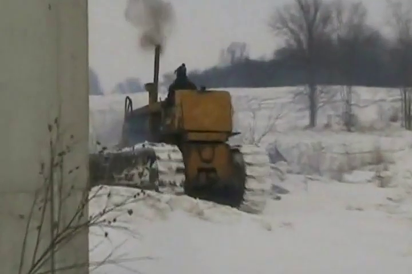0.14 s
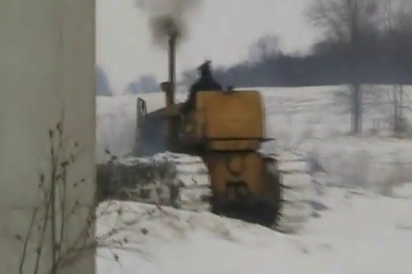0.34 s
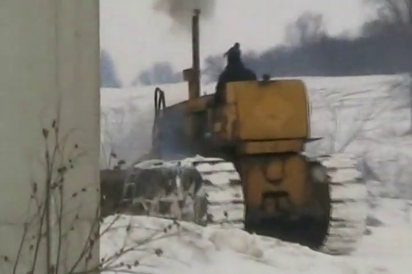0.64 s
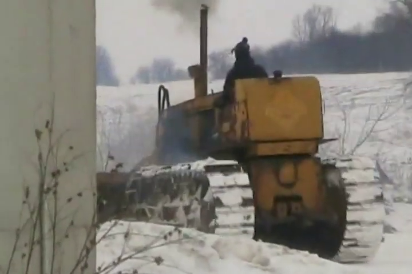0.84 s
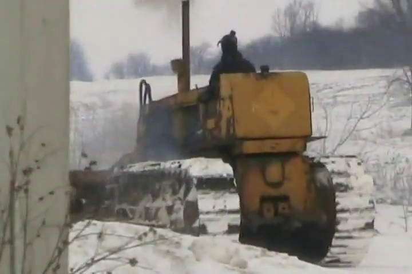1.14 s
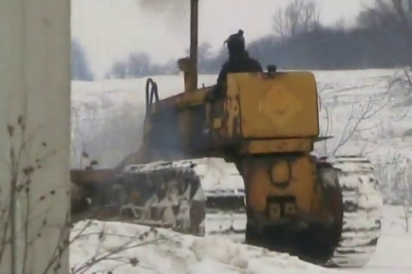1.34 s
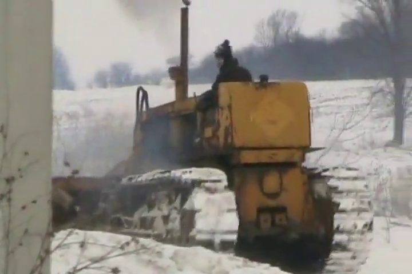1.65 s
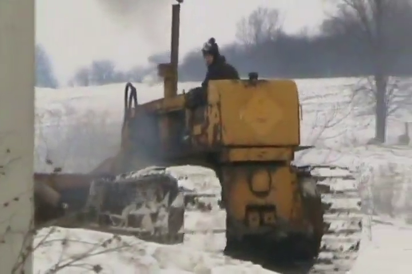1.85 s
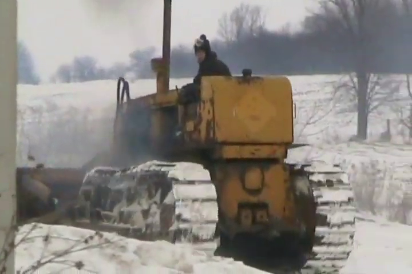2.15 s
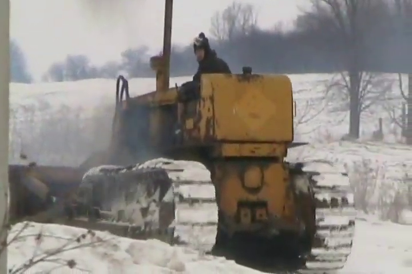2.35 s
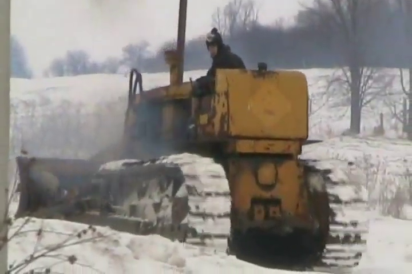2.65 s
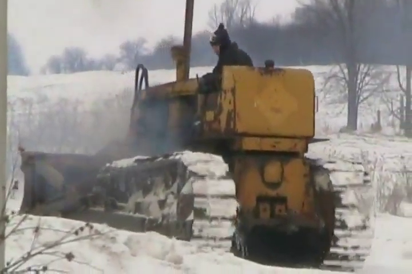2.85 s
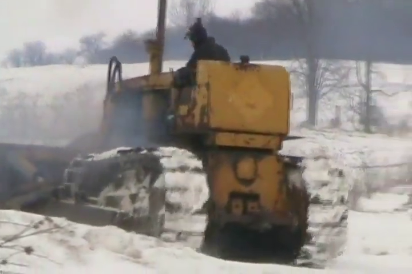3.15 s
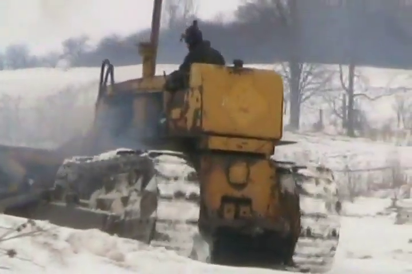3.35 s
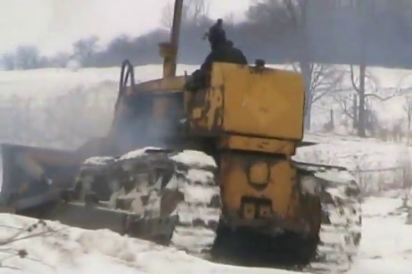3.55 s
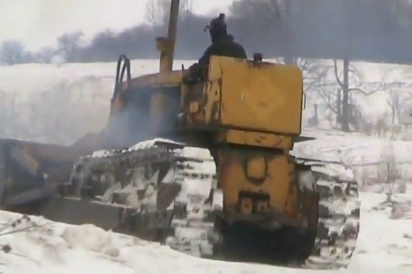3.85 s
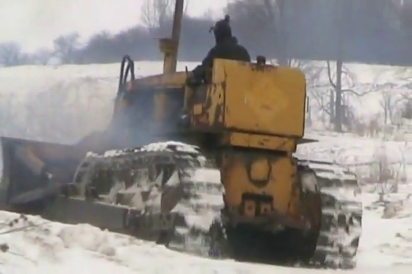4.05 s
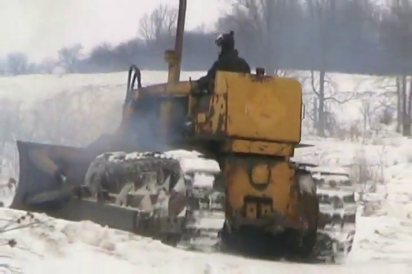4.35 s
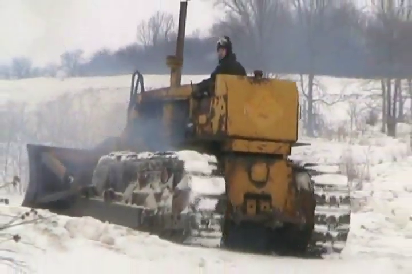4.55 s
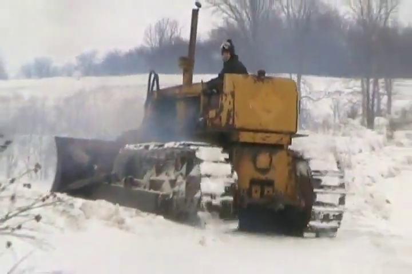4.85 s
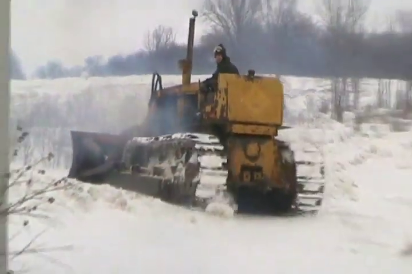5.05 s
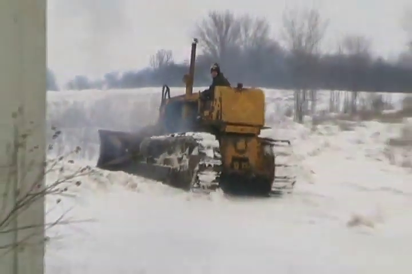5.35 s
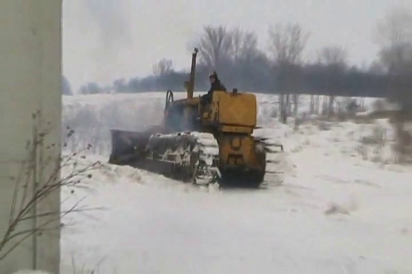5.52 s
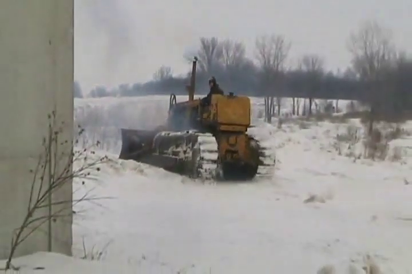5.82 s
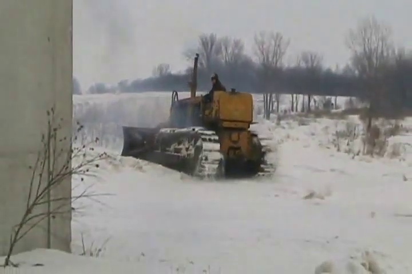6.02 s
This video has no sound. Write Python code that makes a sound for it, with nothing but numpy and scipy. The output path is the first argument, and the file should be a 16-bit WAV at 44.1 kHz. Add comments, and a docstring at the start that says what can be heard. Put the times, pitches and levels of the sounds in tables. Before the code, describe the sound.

An old crawler bulldozer with a diesel engine runs outdoors on snow. At 0 s it idles roughly, with hard, separate metallic knocks about eleven times a second, lighter taps between them and some uneven blows. The revs dip slightly near 0.5 s, then climb in small surges from about 0.6 to 3.3 s; the knocks crowd together into a louder, brighter, harsh clatter at around eighteen a second. A dry wash of gear rattle and small clinks from the tracks thickens with the speed, and a faint gear whine rises. A low exhaust throb and soft puffing lie underneath. From about 3.3 s to the end at 6.2 s the engine holds steady at high revs; after 4.5 s a thin steely ping within the knocks fades. The sound is dry, midrange-heavy and almost mono, with very short reflections, and it stops while still running.

```python
"""Diesel bulldozer revving up

An old six-cylinder diesel bulldozer revs up from idle and crawls through snow past a concrete wall.
Two cylinders knock hard in every cycle, as noise bursts that ring block and panels; lighter taps fall between.
Below lies the exhaust throb, a sum of crankshaft orders, with a rush of noise pulsing at the firing rate.
Filtered noise and ticks make the gear rattle, short decaying notes the tracks, two climbing sines the gear whine."""
import sys
import numpy as np
from scipy import signal
from scipy.fft import rfft, irfft
from scipy.io import wavfile
from scipy.ndimage import uniform_filter1d

SR = 44100
rng = np.random.default_rng(int(sys.argv[2]) if len(sys.argv) > 2 else 0)


def int16_out(signal):
    """Quantize to a 16-bit WAV file."""
    q = np.round(np.clip(np.atleast_2d(signal).T, -1, 1) * 32767)
    wavfile.write(sys.argv[1], SR, q.astype(np.int16))


N = 272538
TIME = np.arange(N) / SR

# engine speed, hunting at idle and then opened up to full revs: t/s, firing rate/Hz
SPEED = [(0, 32.88), (0.45, 31.56), (0.7, 35.39), (1, 34.06), (1.25, 38.99), (1.5, 38.54), (1.9, 43.5),
         (2.25, 45.43), (2.55, 50.69), (3.35, 54.01), (5, 54.73), (6.18, 54.13)]
CYLINDERS = 6
FULL_REVS_HZ = 54  # reference firing rate
START_CYCLES = -.169  # place in the engine cycle at t = 0
# the engine burns more fuel while it gathers speed; the levels answer a moment later
FUEL_LAG_S, FUEL_SMOOTH_S = 0.014, 0.61
# how each part follows the engine: value at full revs/dB, slope/(dB per octave of speed),
# lift while speeding up/(dB per octave per second)
KNOCK_LEVEL = (-18.5, 4.9, 3.75)
KNOCK_TREBLE = (1.6, 4.4, 0.55)
RATTLE_LEVEL = (-22.5, 6.8, 1.8)
RUSH_LEVEL = (-35, 3.7, -0.85)
WHINE_LEVEL = (-46.5, -1.5, 6.1)

# blows of one engine cycle: place in the cycle (0-1), relative level/dB, rise/s, length at full revs/s,
# decay time/s, relative treble/dB, relative panel ring/dB
BLOWS = [(0.089, -25, 0.0029, 0.018, 0.012, 13.5, -5), (0.287, -2, 0.00068, 0.0066, 0.0068, -2, -1),
         (0.616, -12.5, 0.0019, 0.0081, 0.0024, -2.5, -15), (0.787, -15, 0.0028, 0.011, 0.0058, 0, -2),
         (0.949, 0.2, 0.002, 0.0085, 0.0039, -2.5, -13)]
BLOW_STRETCH = 0.48  # a blow's length goes with the cycle time to this power
# knocks that stand out, from a weak or a hard firing: t/s, extra level/dB
ODD_KNOCKS = [(.27, -2.5), (.46, 3.5), (.93, -6.5), (1.1, -7), (1.31, 1), (1.41, -4.5), (1.86, -3),
              (2.31, 1.5), (4.21, 0.5), (5.34, 0), (5.56, 3.5)]
SAME_KNOCK_S = .012  # a blow this close to a listed time takes its extra level
# a thin steel part pings, against the panel ring; it fades as the machine turns its back
PING_DB, PING_TURNED_DB, TURN_START_S, TURN_LENGTH_S = -1.5, -27, 4.5, 0.78
# resonances of block and panels: f/Hz, width/Hz, lift/dB
PANELS = [(340, 6.8, 6), (383, 86, 2.5), (541, 28, 7), (719, 40, 7.5), (903, 65, 6.5), (985, 12, 6),
          (1180, 46, 0), (1600, 41, 0), (1740, 210, 2), (1940, 45, 2.5), (2126, 125, 4), (2424, 31, 2.5),
          (2450, 190, 1), (3690, 330, 2), (4096, 35, -2.5), (4170, 100, -0.5)]
# broad spectra of knocks, rattle and exhaust rush: f/Hz, relative level/dB
KNOCK_COLOUR = [(150, -29), (350, -17.5), (580, -20.5), (850, -6.5), (1250, 1), (1600, -4.5), (2200, -5),
                (3200, -11.5), (4000, -6.5), (5900, -15.5), (8500, -13), (10600, -22), (11500, -30),
                (12500, -84)]
RATTLE_COLOUR = [(150, -18), (400, -20), (600, -4), (900, 3), (1200, 3), (1550, -1), (2000, 0), (3100, -8),
                 (4200, -10.5), (6200, -14), (8500, -17.5), (10600, -23.5), (11600, -52), (12600, -32)]
RUSH_COLOUR = [(12, -10), (28, -2), (60, 4.5), (100, 0.5), (160, 1), (205, -5), (260, -7.5), (380, -2.5),
               (520, -7.5), (900, -22.5), (3000, -60)]

# exhaust orders: multiple of the cycle rate, relative level/dB
ORDERS = [(3, -22), (5, -15), (6, 4.5), (7, -21), (8, -19), (9, -9), (11, -26), (12, -2.5), (15, -31),
          (18, -14), (24, -7.5), (36, -17.5)]
# what the stack passes of each exhaust order: f/Hz, gain/dB
STACK = [(15, -16), (32, -6.5), (55, -3.5), (80, -2), (110, -2), (150, -2.5), (200, -12.5), (260, -2.5),
         (330, 2.5)]
# exhaust throb: t/s, level/dB, lift of its firing overtones/dB
THROB = [(0, -35, 4.5), (1, -34.5, -0.5), (2.8, -32, 1.5), (4.3, -36, -6), (5.2, -35, 4),
         (6.18, -36.5, 1.5)]

# upper gear tone, climbing with the revs: t/s, f/Hz
WHINE_PITCH = [(0, 700), (1, 760), (1.25, 845), (1.85, 915), (2.17, 1027), (2.4, 1038), (2.7, 1130),
               (6.18, 1185)]
# resonances of the gear case: f/Hz, width/Hz, lift/dB
GEAR_CASE = [(941, 154, 16), (1030, 30, 14)]

# difference signal between the channels, relative to the sound itself: f/Hz, level/dB
WIDTH = [(40, -26), (200, -24), (600, -26), (1400, -53), (2800, -40.5), (4500, -18.5), (6000, -16.5),
         (8000, -4.5), (10000, -4), (12000, -28)]
EDGE_HZ = 12850  # upper band limit


def from_db(db):
    """Logarithmic level: 20 dB is a factor of ten in amplitude."""
    return 10 ** (np.asarray(db) / 20)


def unit(x):
    """Normalization: scales to rms 1."""
    return x / np.sqrt(np.mean(x ** 2) + 1e-20)


def curve(rows, axis=1):
    """Linear interpolation: one column of a time table at every sample."""
    columns = np.transpose(rows)
    return np.interp(TIME, columns[0], columns[axis])


def spectrum_db(points, hz):
    """Logarithmic frequency scale: reads a spectrum between its points."""
    f, db = np.transpose(points)
    return np.interp(np.log(hz + 1), np.log(f + 1), db)


def resonance_db(hz, modes):
    """Resonance: each mode lifts the level in a bell around its own frequency."""
    return sum(lift / (1 + (2 * (hz - f) / width) ** 2) for f, width, lift in modes)


def wander(rate_hz):
    """Low-passed noise: a smooth random signal of rms 1, weak above the given rate."""
    hz = np.fft.rfftfreq(N, 1 / SR)
    noise = rng.standard_normal(N)
    return unit(irfft(rfft(noise) / (1 + (hz / rate_hz) ** 4), N))


def colour(x, points, modes=(), size=8192):
    """Minimum-phase filtering: a broad spectrum with narrow resonances that ring on."""
    hz = abs(np.fft.fftfreq(size, 1 / SR))
    db = spectrum_db(points, hz) + resonance_db(hz, modes)
    # the Hilbert transform of the log magnitude gives the causal phase
    transfer = np.exp(np.conj(signal.hilbert(np.log(from_db(db)))))
    response = np.fft.ifft(transfer).real
    return signal.oaconvolve(x, response[:size // 2])[:N]


def add(mix, s, sound):
    """Superposition: adds a sound to the mix at time s."""
    part = mix[max(round(s * SR), 0):][:len(sound)]
    part += sound[:len(part)]


def engine_db(full_db, per_octave_db, speeding_up_db):
    """Engine load: a level follows the revs and the fuel burnt to gather speed."""
    octaves = np.log2(curve(SPEED) / FULL_REVS_HZ)
    octaves_per_s = np.gradient(octaves) * SR
    climb = uniform_filter1d(octaves_per_s, max(round(FUEL_SMOOTH_S * SR), 1))
    late_climb = np.interp(TIME - FUEL_LAG_S, TIME, climb)
    return full_db + per_octave_db * octaves + speeding_up_db * late_climb


def ring(t, hz, swell_s):
    """Damped vibration: a part shaken by the chatter swells and dies within milliseconds."""
    return (t / swell_s) ** 2 * np.exp(-t / swell_s) * np.sin(2 * np.pi * hz * t)


def knocks(cycles, jitter_s=.0005, uneven_db=.5, length_spread=0.1, treble_uneven_db=2, treble_hz=3500,
           ring_hz=1290, ring_spread=0.099, ring_s=0.0023, ring_uneven_db=3,
           ping_hz=4000, ping_s=0.0029, ping_spread=0.025, ping_uneven_db=4,
           patchy_db=3, lumpy_db=-1.5, size=3000, count=36):
    """Impact excitation: bursts of metal-on-metal chatter set panels ringing for a few periods."""
    t = np.arange(size) / SR
    chatter, sizzle, rings = np.zeros((3, N))
    for place, db, rise_s, length, decay, treble_db, ring_db in BLOWS:
        marks = np.arange(-1, cycles[-1]) + place
        marks = marks[(marks > cycles[0]) & (marks < cycles[-1])]
        for s in np.interp(marks, cycles, TIME):
            early, force, bright, long, pitch, rung, sharp, pinged = np.clip(rng.standard_normal(8), -2, 2)
            start = s + jitter_s * early
            stretch = (FULL_REVS_HZ / np.interp(s, *np.transpose(SPEED))) ** BLOW_STRETCH
            held = length * stretch * np.exp(length_spread * long)
            shape = np.minimum(t / rise_s, 1) * np.exp(-np.maximum(t - held, 0) / decay)
            odd_db = sum(extra for at, extra in ODD_KNOCKS if abs(at - s) < SAME_KNOCK_S)
            # a longer burst is weaker, to keep its energy
            gain = from_db(db + odd_db + uneven_db * force) * np.sqrt(length / held)

            # the parts bounce, so the burst comes in lumps
            lumps = from_db(lumpy_db * signal.resample(rng.standard_normal(count), size))
            grain = unit(lumps * rng.standard_normal(size))
            add(chatter, start, gain * shape * grain)

            # the upper partials are weighted afresh each time
            patches = from_db(patchy_db * signal.resample(rng.standard_normal(count), size // 2 + 1))
            patchy_grain = unit(irfft(rfft(grain) * patches))
            treble_gain = from_db(treble_db + treble_uneven_db * bright)
            add(sizzle, start, gain * shape * patchy_grain * treble_gain)

            clank_hz = ring_hz * np.exp(ring_spread * pitch)
            clank = from_db(ring_db + ring_uneven_db * rung) * ring(t, clank_hz, ring_s)
            turned = np.clip((s - TURN_START_S) / TURN_LENGTH_S, 0, 1)
            ping_db = PING_DB + PING_TURNED_DB * turned + ring_db + ping_uneven_db * pinged
            ping = from_db(ping_db) * ring(t, ping_hz * np.exp(ping_spread * sharp), ping_s)
            add(rings, start, gain * (clank + ping))

    below = signal.butter(1, treble_hz, fs=SR)
    treble = (sizzle - signal.lfilter(*below, sizzle)) * from_db(engine_db(*KNOCK_TREBLE))
    drive = signal.lfilter(*below, chatter) + treble + from_db(-4) * rings
    return unit(colour(drive, KNOCK_COLOUR, PANELS)) * from_db(engine_db(*KNOCK_LEVEL))


def yard(x, t60_s=0.071, delay_s=.005, wet_db=-10, dull_hz=4500, size=10000, count=4):
    """Scattering: short echoes off blade, tracks and wall, whose paths change as the machine moves."""
    t = np.arange(size) / SR
    out = np.zeros(N)
    position = np.linspace(0, count - 1, N)
    for k in range(count):
        taps = rng.standard_normal(size) * (t > delay_s) * from_db(-60 * t / t60_s)
        taps = signal.lfilter(*signal.butter(1, dull_hz, fs=SR), taps / np.linalg.norm(taps))
        # equal-power crossfade from one set of paths to the next
        share = np.sqrt(np.maximum(1 - abs(position - k), 0))
        out += signal.oaconvolve(x * share, taps)[:N]
    return from_db(wet_db) * out


def rattle(ticks_per_s=700, flutter_db=3.5, treble_hz=2500, brightening=0.46):
    """Dense random impacts: gear and valve-train ticks in a fluttering wash, brighter when busier."""
    ticks = (rng.random(N) < ticks_per_s / SR) * rng.choice([-1, 1], N)
    wash = rng.standard_normal(N)
    drive = (wash + unit(ticks)) * from_db(flutter_db * wander(37.4))
    busy_db = engine_db(*RATTLE_LEVEL)
    dull = signal.lfilter(*signal.butter(1, treble_hz, fs=SR), drive)
    drive = dull + (drive - dull) * from_db(brightening * (busy_db - busy_db.mean()))
    return unit(colour(drive, RATTLE_COLOUR, PANELS)) * from_db(busy_db)


def tracks(clinks_per_s=60, low_hz=800, high_hz=2600, ring_s=0.013, level_db=-10, size=2500, count=24):
    """Free damped vibration: snow-packed links and pins clink at random, each with a note of its own."""
    t = np.arange(size) / SR
    out = np.zeros(N)
    for hz in np.geomspace(low_hz, high_hz, count):
        strikes = (rng.random(N) < clinks_per_s / count / SR) * rng.uniform(0.5, 1, N)
        envelope = np.exp(-t / ring_s) * (1 - np.exp(-t / 0.00076))
        note = np.sin(2 * np.pi * hz * t) * envelope
        out += signal.oaconvolve(strikes, note / np.sqrt(hz))[:N]
    # level_db is relative to the rattle
    return unit(out) * from_db(engine_db(*RATTLE_LEVEL) + level_db)


def exhaust(cycles, lead_cycles=0.024, waver=0.093, puff_depth=0.35):
    """Periodic gas pulses: orders of the cycle rate throb unevenly, and each firing puffs out gas."""
    angle = 2 * np.pi * (cycles + lead_cycles)
    cycle_hz = curve(SPEED) / CYLINDERS
    throb = np.zeros(N)
    for k, db in ORDERS:
        # orders that are no multiple of the firing rate come from unequal cylinders
        overtone = k > CYLINDERS and k % CYLINDERS == 0
        level_db = db + spectrum_db(STACK, k * cycle_hz) + overtone * curve(THROB, axis=2)
        throb += from_db(level_db) * np.cos(k * angle) * (1 + waver * wander(3.1))
    puffs = rng.standard_normal(N) * (1 + puff_depth * np.cos(CYLINDERS * angle))
    rush = unit(colour(puffs, RUSH_COLOUR, PANELS))
    return unit(throb) * from_db(curve(THROB)) + rush * from_db(engine_db(*RUSH_LEVEL))


def whine(flutter=0.005, waver_db=3, second_db=-2):
    """Gear meshing: two tones climb with the revs; the upper swells at the gear-case resonances."""
    hz = curve(WHINE_PITCH)
    swell_db = resonance_db(hz, GEAR_CASE)
    angle = 2 * np.pi * np.cumsum(hz * (1 + flutter * wander(44))) / SR
    lower_angle = angle * 2 / 3
    tones = from_db(swell_db) * np.sin(angle) + from_db(second_db) * np.sin(lower_angle)
    return np.sqrt(2) * tones * from_db(engine_db(*WHINE_LEVEL) + waver_db * wander(29))


def stereo_width(x, scatter=1.0, wander_hz=60):
    """Stereo width: a faint channel difference, strongest at 8 to 10 kHz, with a randomly wandering phase."""
    hz = np.fft.rfftfreq(N, 1 / SR)
    difference = irfft(rfft(x) * from_db(spectrum_db(WIDTH, hz)), N)
    phase = np.pi / 2 + scatter * wander(wander_hz)  # radians
    side = (signal.hilbert(difference) * np.exp(1j * phase)).real
    return np.array([x + side, x - side])


def scene():
    """Common excitation: one crankshaft times both knocks and exhaust."""
    cycles = START_CYCLES + np.cumsum(curve(SPEED)) / SR / CYLINDERS
    clatter = knocks(cycles)
    machine = clatter + yard(clatter) + rattle() + tracks() + exhaust(cycles) + whine()
    return stereo_width(machine)


def record(dry, ceiling=1.0):
    """Soft saturation and band limiting: the loudest peaks are rounded off, then the top is cut."""
    rounded = dry / (1 + (dry / ceiling) ** 6) ** (1 / 6)
    lowpass = signal.firwin(401, EDGE_HZ, window=("kaiser", 9), fs=SR)
    return signal.oaconvolve(rounded, lowpass[None], "same")


dry = scene()
out = record(dry)
int16_out(out)
```